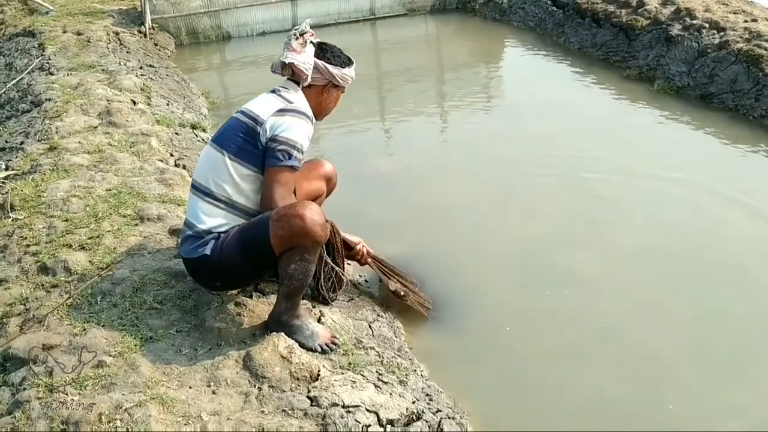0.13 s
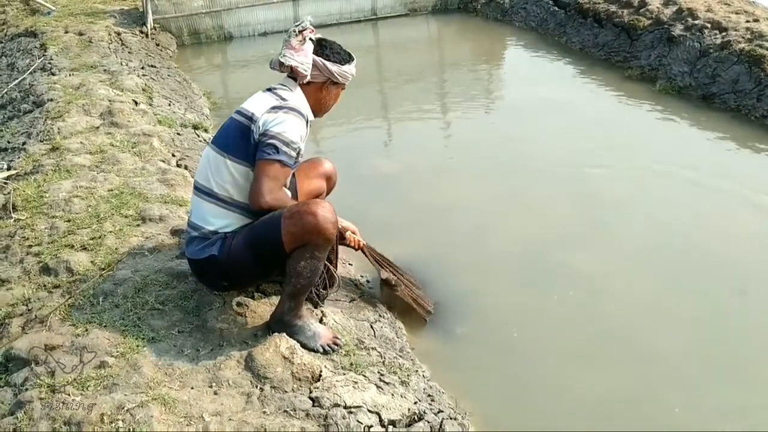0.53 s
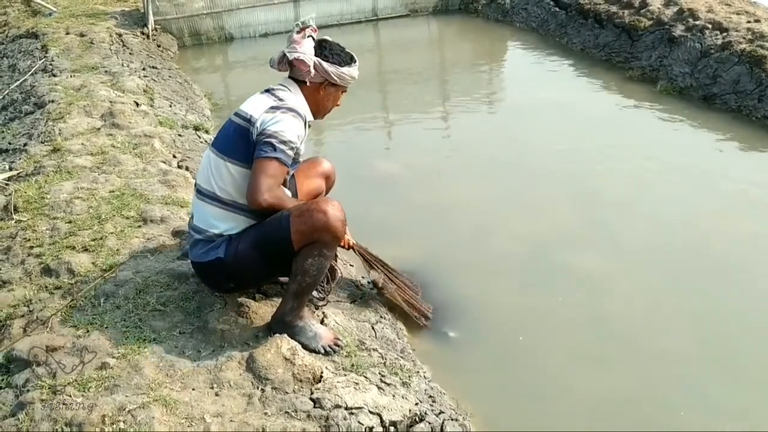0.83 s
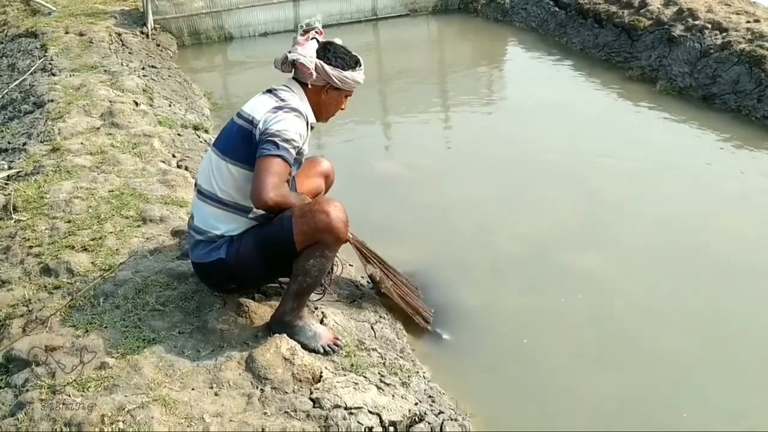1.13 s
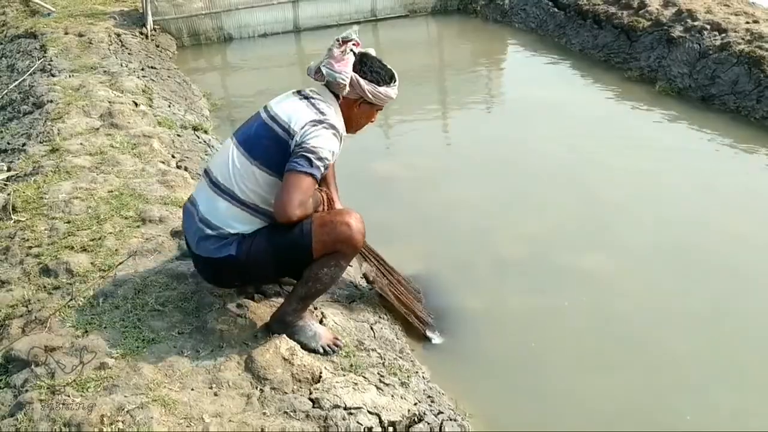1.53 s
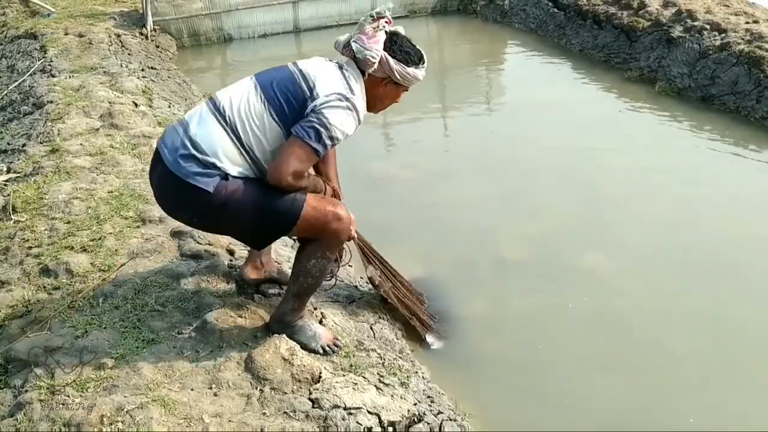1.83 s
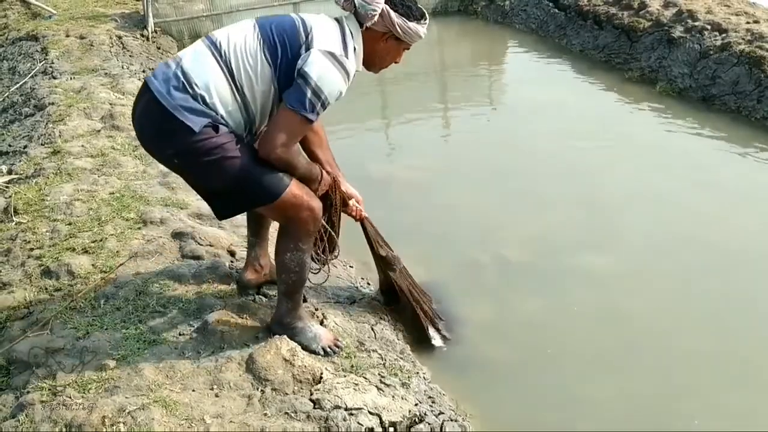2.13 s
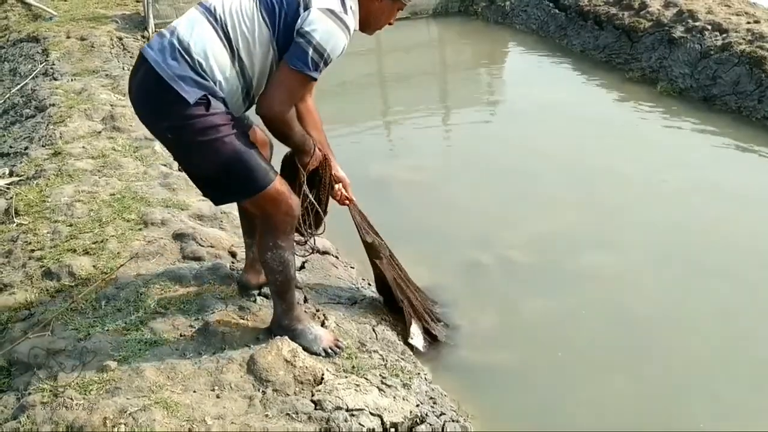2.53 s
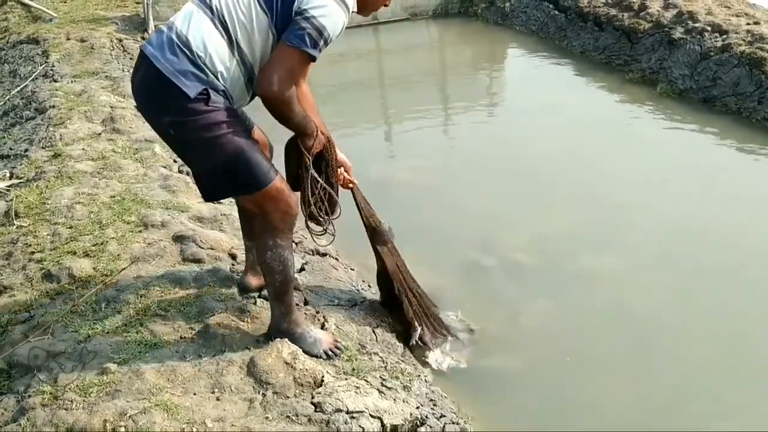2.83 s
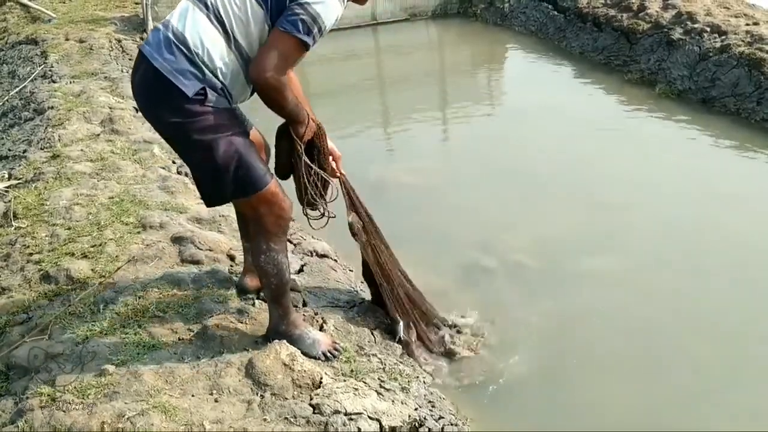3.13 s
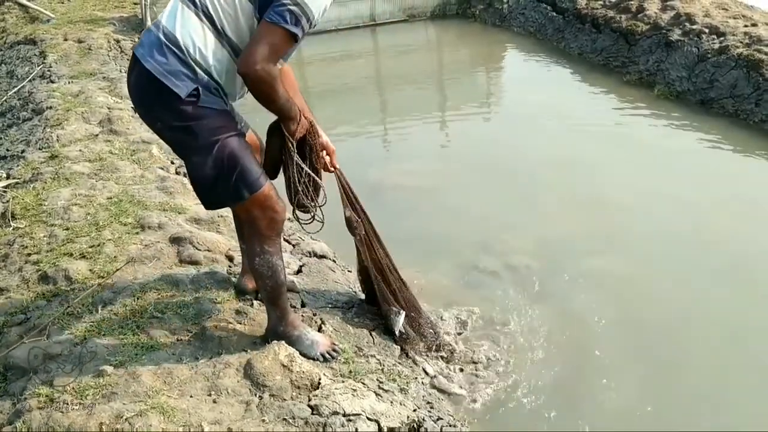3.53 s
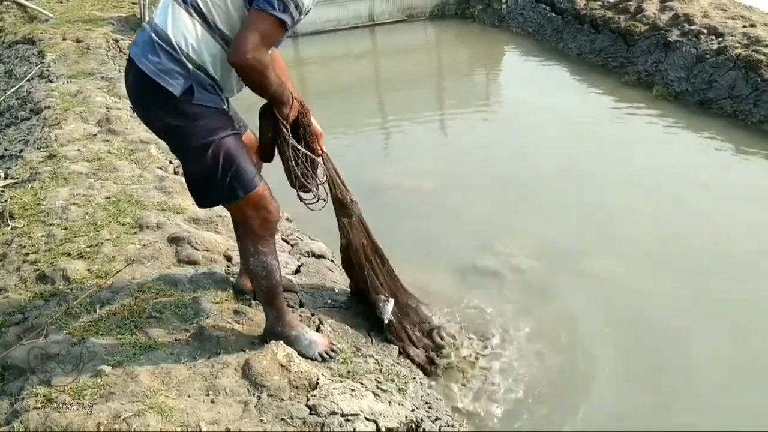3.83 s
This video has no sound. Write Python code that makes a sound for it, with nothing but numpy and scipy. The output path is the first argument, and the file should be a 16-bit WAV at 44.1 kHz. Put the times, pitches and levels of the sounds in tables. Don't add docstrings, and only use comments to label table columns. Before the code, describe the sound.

Wet splashing and sloshing of a hauled net, preceded by throbbing, crackling wind on the microphone

```python
import sys
import numpy as np
from scipy import signal
from scipy.fft import rfft, irfft
from scipy.io import wavfile
from scipy.ndimage import uniform_filter1d

SR = 44100
rng = np.random.default_rng(int(sys.argv[2]) if len(sys.argv) > 2 else 0)


def boost(x):
    u = np.asarray(x, float) / 20
    return 10 ** u


def inscribe(sig):
    pcm = np.round(np.clip(np.atleast_2d(sig).T, -1, 1) * 32767)
    wavfile.write(sys.argv[1], SR, pcm.astype(np.int16))


N = 176400
KNEE = 0.049


def evened(x):
    return x / np.sqrt(np.mean(x ** 2) + 1e-20)


def read(points, hz):
    f, value = np.transpose(points)
    return np.interp(np.log(hz + 1), np.log(f + 1), value)


def coloured(x, points):
    return irfft(rfft(x) * boost(read(points, np.fft.rfftfreq(N, 1 / SR))), N)


def wander(top_hz, channels=1):
    hz = np.fft.rfftfreq(N, 1 / SR)
    noise = rfft(rng.standard_normal((channels, N)))
    return evened(irfft(noise / (1 + (hz / top_hz) ** 4), N))


def swell(start, length, db, fall_db, rise):
    t = np.arange(N) / SR - start
    return np.clip(t / rise + .5, 0, 1) * boost(db - fall_db * np.maximum(t - length, 0))


def blip(s, db, hz, width, glide):
    u = np.maximum(np.arange(N) / SR - s, 0)
    envelope = (u / width) * np.exp(1 - u / width)
    return boost(db) * np.sin(2 * np.pi * hz * u * (1 + glide * u)) * envelope


def bumps(rows, width):
    train = np.zeros(N)
    for s, db in rows:
        train[round(s * SR)] = boost(db)
    hump = np.exp(-(np.arange(-900, 901) / SR / width) ** 2)
    return signal.oaconvolve(train, hump, "same")


def ports(points, right_db, own_db):
    shared, own = rng.standard_normal((2, N))
    own = coloured(own, [(30, own_db + 8.5), (300, own_db + 3)])
    pair = np.array([shared, boost(right_db) * (shared + own)])
    return evened(coloured(pair, points))


def wind():
    # t/s, length/s, force level/dB, edge relative to force/dB
    gust_rows = [(0, 0.0089, -28.5, -2), (0.054, 0.038, -39.5, -5), (0.118, 0.035, -55, -10),
                 (0.208, 0.044, -41, 1.5), (0.26, 0.29, -46.5, -26), (0.399, 0.024, -31.5, -1.5),
                 (0.467, 0.058, -46, -3.5), (0.598, 0.064, -65, -9), (0.658, 0.024, -47, -26),
                 (0.703, 0.041, -56.5, -13), (0.772, 0.034, -51.5, -5), (0.825, 0.12, -32.5, 0),
                 (0.966, 0.05, -26, -7.5), (1.02, 0.037, -33.5, -4.5), (1.08, 0.069, -39, -1.5),
                 (1.146, .14, -32, 3.5), (1.316, 0.061, -33, 2.5), (1.391, 0.039, -37, -12),
                 (1.52, 0.0088, -47, -24), (1.57, 0.038, -46, -25), (1.609, 0.027, -51.5, -5),
                 (1.672, 0.033, -47.5, -11), (1.719, 0.11, -34, 1.5), (1.856, 0.015, -34.5, -4.5),
                 (1.893, 0.089, -36.5, 0.5), (2.001, 0.085, -32.5, -1.5), (2.108, 0.061, -33, 6.5),
                 (2.19, 0.19, -41, 9.5), (2.397, 0.063, -34, 1.5), (2.485, 0.025, -37.5, -3),
                 (2.57, 0.11, -47, 3.5), (2.676, 0.327, -35, 5), (3.019, 0.032, -33, -2),
                 (3.129, 0.015, -52.5, -20), (3.162, 0.017, -33, -3.5), (3.199, 0.049, -37, 4),
                 (3.261, 0.053, -42, -24), (3.351, 0.028, -50.5, -13.5), (3.414, 0.0069, -44, -2.5),
                 (3.432, 0.045, -35.5, -1), (3.491, 0.021, -55, -18), (3.582, 0.1, -37.5, 4.5),
                 (3.705, .17, -38.5, 6.5), (3.892, 0.099, -41, 6)]
    # f/Hz, level/dB
    throb_bands = [(12, -48.5), (20, -32), (43, -23), (84, 0), (123, -5), (154, -5.5), (173, -12),
                   (338, -37.5), (1200, -59.5), (1560, -94), (2640, -120)]
    # f/Hz, level/dB
    edge_bands = [(20, -65), (120, 6), (220, 7.5), (400, -1), (700, -16.5), (1200, -38), (2500, -54.5),
                  (9000, -71.5)]
    rise_s, flutter_db = .009, 3
    throb = np.max([swell(s, n, db, 596.5, rise_s) for s, n, db, e in gust_rows], axis=0)
    edge = np.max([swell(s, n, db + e, 899, rise_s) for s, n, db, e in gust_rows], axis=0)
    throb = throb + boost(-69.5)
    edge = edge + boost(-98)
    lumps = wander(25)
    low = throb * boost(1.9 * lumps) * ports(throb_bands, -3, -16.5)
    roughness = boost(-0.5 + 2.17 * lumps + flutter_db * wander(150))
    return low + edge * roughness * ports(edge_bands, -2.5, -19.0)


def chatter(held):
    # multiple of the block rate, level/dB
    step_harmonics = [(1, -8), (2, -2.5), (3, -16), (4, -10)]
    # t/s, length/s, level/dB
    overload_rows = [(0.391, 0.018, -57), (0.838, 0.097, -62.5), (0.957, 0.056, -61.5),
                     (1.159, 0.12, -63.5), (1.328, 0.063, -61), (1.735, 0.16, -62), (1.979, 0.089, -64),
                     (2.11, 0.051, -62.5), (2.19, 0.17, -59), (2.394, 0.11, -60), (2.66, 0.3, -63)]
    # t/s, level/dB
    bite_rows = [(0.8677, -59), (0.905, -62), (0.9108, -57), (0.9697, -65), (0.9916, -68), (1.0355, -67),
                 (1.0449, -58.5), (1.1697, -79), (1.1768, -55), (1.187, -64), (1.1952, -60), (1.203, -57),
                 (1.2149, -65), (1.2312, -63), (1.2583, -72), (1.2677, -66), (1.2756, -64), (1.3599, -69),
                 (1.371, -69), (1.7301, -69), (1.7448, -79), (1.7668, -66), (1.7813, -69), (1.7893, -63),
                 (1.7983, -64), (1.8041, -61.8), (1.9137, -65.5), (1.9838, -71), (2.0333, -68),
                 (2.0375, -60.5), (2.0439, -60.5), (2.1408, -61.5), (2.2084, -62.5), (2.2451, -76),
                 (2.2587, -69), (2.2859, -72), (2.2951, -62.5), (2.3032, -63), (2.3375, -57), (2.4008, -71),
                 (2.4388, -76), (2.4481, -70), (2.4529, -57.5), (2.4597, -66), (2.7325, -62), (2.7402, -58),
                 (2.7673, -63), (2.8437, -55.8), (2.9148, -59.5), (3.0298, -59)]
    block_hz = 3000
    crest = np.maximum(np.maximum(held[0], -.75 * held[0]) / KNEE - .45, 0) ** 2
    t = np.arange(N) / SR
    mix, drift = boost(4 * wander(90, channels=4)), wander(700, channels=4)
    buzz = np.zeros(N)
    for (k, db), m, phase in zip(step_harmonics, mix, drift):
        buzz += boost(db) * m * np.cos(2 * np.pi * k * block_hz * t + phase)
    rasp = coloured(rng.standard_normal(N), [(1000, -6.0), (2500, 0.5), (14500, -9), (15500, -47.0)])
    buzz = buzz + boost(-7.5) * evened(rasp)
    loose = sum(swell(s, n, db, 2500, 0.0044) for s, n, db in overload_rows)
    loose = boost(-5) * np.tanh(3 * crest) * loose
    return buzz * (loose + boost(-0.5) * bumps(bite_rows, 0.00071)) * boost([[0], [-1.5]])


def limited(gusts):
    ceiling_db = -31
    power_db = 10 * np.log10(abs(uniform_filter1d(gusts[0] ** 2, 500)) + 1e-12)
    excess_db = uniform_filter1d(np.maximum(power_db - ceiling_db, 0), 120)
    held = gusts / boost(0.84 * excess_db)
    size = abs(held[0])
    soft = held * KNEE * np.tanh(size / KNEE + 1e-9) / (size + 1e-9 * KNEE)
    return soft + chatter(held)


def eddies():
    # t/s, level/dB
    eddy_rows = [(0.0762, -59.5), (0.2245, -57), (0.5033, -69), (0.8266, -66.5), (0.8924, -45.5),
                 (0.9842, -46), (1.1583, -48.5), (1.1873, -43.5), (1.2682, -55), (1.3373, -53.4),
                 (1.3618, -47.5), (1.7522, -50), (1.7801, -44), (1.8004, -45), (2.1524, -40.5),
                 (2.198, -47.5), (2.2602, -48.0), (2.2751, -39), (2.2917, -41), (2.3057, -40),
                 (2.3204, -37.5), (2.3472, -40), (2.4012, -47.5), (2.4149, -42.5), (2.6163, -45),
                 (2.7023, -41.5), (2.7594, -45.5), (2.7759, -42), (2.8154, -44), (2.9242, -47.4)]
    # f/Hz, level/dB
    eddy_bands = [(150, -17), (350, 5), (800, -4.5), (1600, -24.5), (3000, -45), (8000, -68.5)]
    return bumps(eddy_rows, 0.0032) * boost(6) * ports(eddy_bands, -3.1, -23.5)


def knocks():
    # t/s, peak level/dB, f/Hz
    knock_rows = [(.085, -34, 485), (.402, -38, 547), (.873, -33, 548), (1.088, -44, 685),
                  (1.62, -47.5, 350), (2.15, -36, 780), (2.447, -29, 556), (2.613, -47.5, 906),
                  (2.679, -31, 695), (3.204, -31.5, 780), (3.577, -36.5, 480), (3.962, -33, 582)]
    return sum(blip(s, db + .5, hz, 0.0018, -22) for s, db, hz in knock_rows) * boost([[1.3], [-1.4]])


def grains(rate, low_hz, high_hz, cycles, spread_db, count=24):
    out = np.zeros((2, N))
    for hz in np.geomspace(low_hz, high_hz, num=count):
        u = np.arange(0, 3 * cycles, hz / SR)
        shape = np.sin(2 * np.pi * u * (1 + 0.0212 * u)) * np.exp(-u / cycles * 2) * np.minimum(u / 2, 1)
        shape = shape / np.linalg.norm(shape) / np.sqrt(hz)
        hits = rng.random((2, N)) < rate / count / SR
        hits = hits * boost(spread_db * np.minimum(rng.exponential(1, (2, N)), 4))
        out += signal.oaconvolve(hits, shape[None], axes=1)[:, :N]
    return evened(out)


def spray_and_bubbles():
    # f/Hz, level/dB
    spray_bands = [(300, -46), (440, -4.5), (2200, -10), (2900, -13), (9400, -20), (14000, -24.5),
                   (15400, -22), (15800, -51)]
    lifted = [(f, db + 6 * np.log2(f / 1000)) for f, db in spray_bands]
    fizz = evened(coloured(grains(6000, 600, 15000, 7, 3), lifted))
    hiss = evened(coloured(rng.standard_normal((2, N)), spray_bands))
    bubbles = grains(700, 1000, 9000, 13, 4)
    return boost(-2.5) * fizz + boost(-6) * hiss + boost(-6) * bubbles


def thrashing(hz, when):
    # t/s, level/dB
    effort_curve = [
        (2.62, -74),
        (2.8, -84),
        (3.05, -75),
        (3.14, -64.5),
        (3.33, -61),
        (3.405, -66),
        (3.46, -62),
        (4, -57.5),
    ]
    # t/s, peak level/dB, spray centre f/Hz
    slap_rows = [(2.784, -45.5, 4950), (2.85, -47.5, 5500), (2.875, -45.5, 2500), (2.956, -52.5, 5150),
                 (3.061, -57.5, 2400), (3.123, -41.5, 3000), (3.15, -45, 1880), (3.205, -41.5, 3520),
                 (3.236, -48.5, 2210), (3.26, -41, 6040), (3.309, -54, 5930), (3.433, -43.5, 2260),
                 (3.478, -36, 8100), (3.524, -39.5, 4020), (3.574, -41, 7850), (3.616, -46, 3670),
                 (3.672, -42.5, 7000), (3.745, -56, 7500), (3.812, -52, 2780), (3.874, -41, 2000),
                 (3.89, -41.5, 8000), (3.93, -46.5, 7960), (3.983, -50, 12100)]
    slap_octaves = 1.2
    at, db = np.transpose(effort_curve)
    onset = np.clip((when - at[0]) / 0.017, 0, 1)
    effort = boost(np.interp(when, at, db)) * onset * np.ones((len(hz), 1))
    octave = np.log2(hz + 1)[:, None]
    frame = np.minimum(when * SR, N - 1).astype(int)
    for s, db, centre in slap_rows:
        colour = 0.39 + np.exp(-((octave - np.log2(centre)) / slap_octaves) ** 2)
        effort = effort + swell(s, 0.0038, db - 14.0, 416, 0.012)[frame] * colour
    return effort


def plops():
    # t/s, peak level/dB, f/Hz
    plop_rows = [(2.878, -39, 1500), (3.1, -45, 2550), (3.1485, -37, 1750), (3.1644, -41, 1800),
                 (3.2108, -47, 2330), (3.2335, -42, 2070), (3.437, -33.5, 1230), (3.5295, -33.5, 2530),
                 (3.8182, -41, 2440), (3.8716, -42, 1910), (3.9, -41.5, 2370)]
    return sum(blip(s, db - 6.5, hz, 0.00091, 1.4) for s, db, hz in plop_rows)


def at_microphone(near, own):
    # f/Hz, coherence
    water_same = [(1000, 0.87), (2500, 0.74), (4500, 0.13), (9000, 0.25)]
    # f/Hz, level/dB
    water_pan = [(1000, -7.5), (2000, -2), (4500, -7), (9000, -1.5)]
    # f/Hz, phase/rad
    water_turn = [(2500, .1), (4500, 2.1), (7500, .1)]
    hz = np.fft.rfftfreq(N, 1 / SR)
    peak_db = 4.5 * np.exp(-((hz - 2440) / 145) ** 2)
    notch_db = -5.5 * np.exp(-((hz - 2760) / 110) ** 2)
    same = np.clip(read(water_same, hz), 0, 1)
    left = same * rfft(near) * np.exp(1j * read(water_turn, hz)) + np.sqrt(1 - same ** 2) * rfft(own)
    left = left * boost(read(water_pan, hz))
    return irfft(np.array([left, rfft(near)]) * boost(peak_db + notch_db), N)


def water():
    patchy_db = 2.5
    hz, when, z = signal.stft(spray_and_bubbles(), SR, nperseg=256, noverlap=192)
    patches = rng.standard_normal(z.shape[1:])
    patches = uniform_filter1d(patches, size=4, axis=0)
    patches = evened(uniform_filter1d(patches, size=16, axis=1))
    z = z * thrashing(hz, when) * boost(patchy_db * patches)
    near, own = signal.istft(z, SR, nperseg=256, noverlap=192)[1][:, :N]
    return at_microphone(near + plops(), own)


def ticks():
    # t/s, peak level/dB
    tick_rows = [
        (.002, -84),
        (0.226, -71.5),
        (0.279, -75.5),
        (2.586, -61.5),
    ]
    tick_bands = [(1500, -27), (4500, -12.5), (7800, -1.0), (11500, -14.5), (14000, -6.5), (16000, -12)]
    shape = sum(swell(s, 0.0012, db, 1200, 0.005) for s, db in tick_rows)
    return shape * ports(tick_bands, 1.5, -4.5)


def open_air():
    # f/Hz, level/dB
    air_bands = [(320, -21), (400, -1), (474, -8.5), (1030, -25.5), (3020, -29), (6050, -33.5),
                 (10200, -32.5), (16000, -41.5)]
    stir = boost(-81) * (1 + swell(.22, 0.062, 0.68, 65, .02))
    return stir * ports(air_bands, 1.7, -1.2)


def scene():
    return limited(wind()) + eddies() + knocks() + water() + ticks() + open_air()


def top_cut(x):
    return signal.sosfilt(signal.butter(12, 15900, fs=SR, output="sos"), x)


def record(dry):
    capped = dry / (1 + (dry / .075) ** 4) ** .25
    return top_cut(capped)


dry = scene()
out = record(dry)
inscribe(out)
```